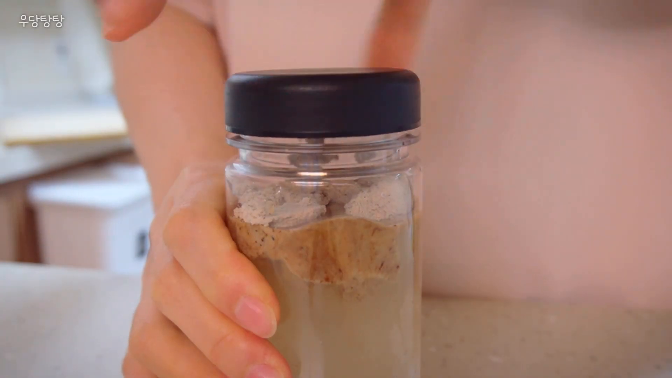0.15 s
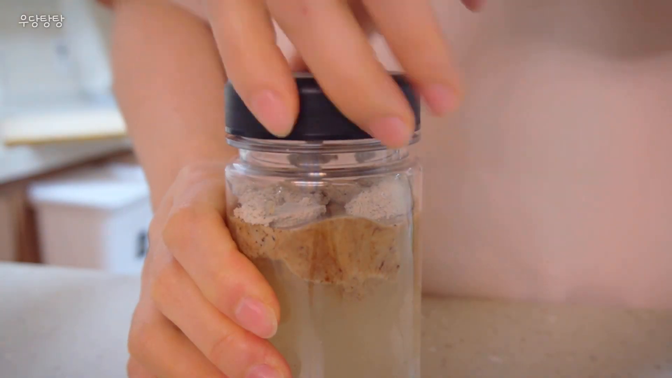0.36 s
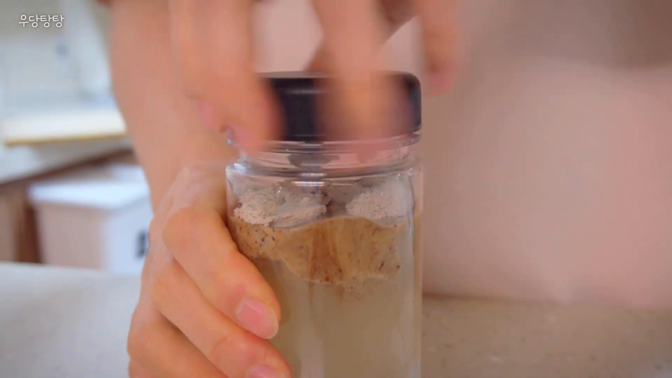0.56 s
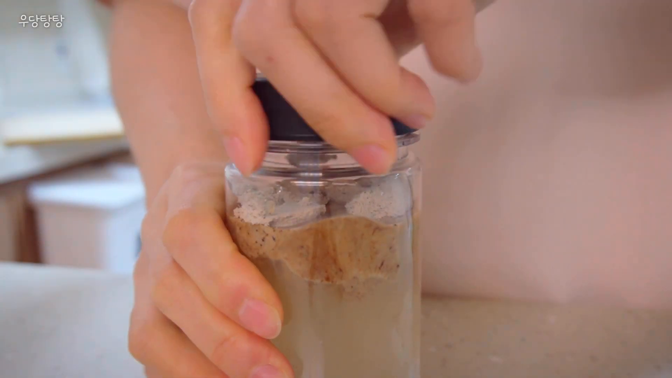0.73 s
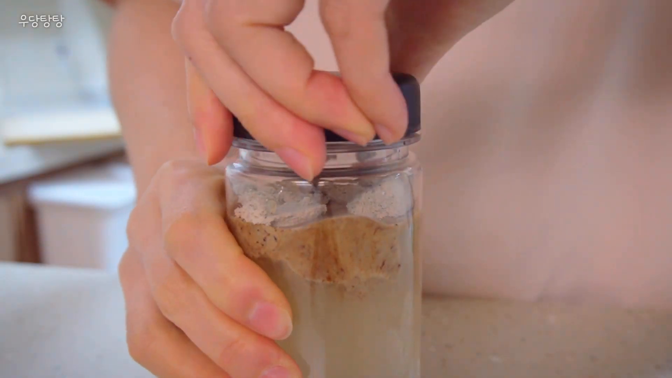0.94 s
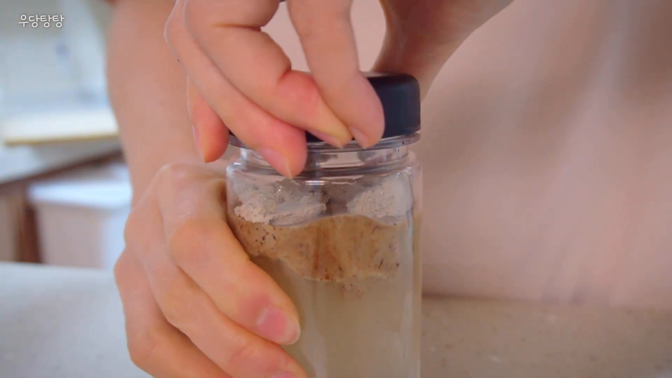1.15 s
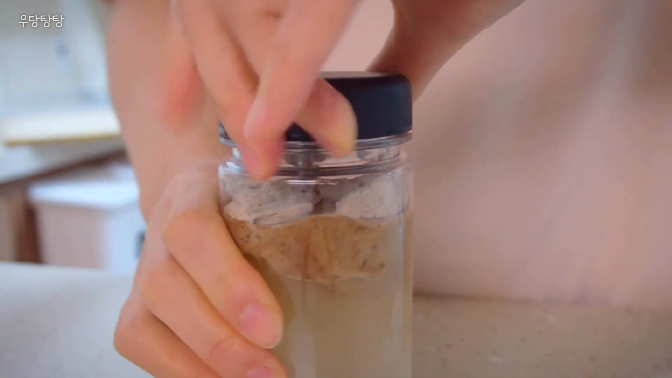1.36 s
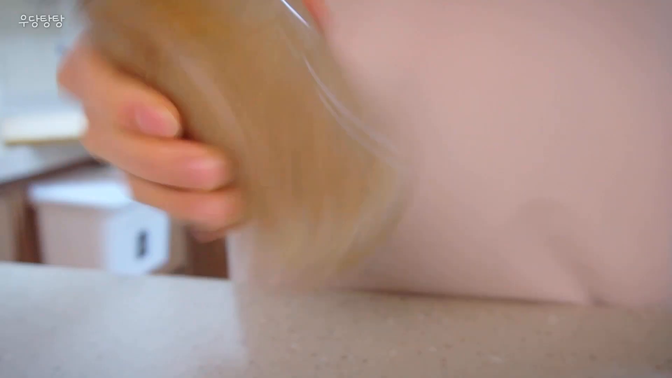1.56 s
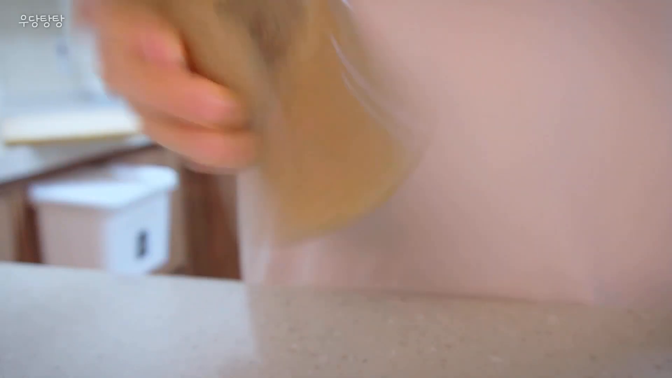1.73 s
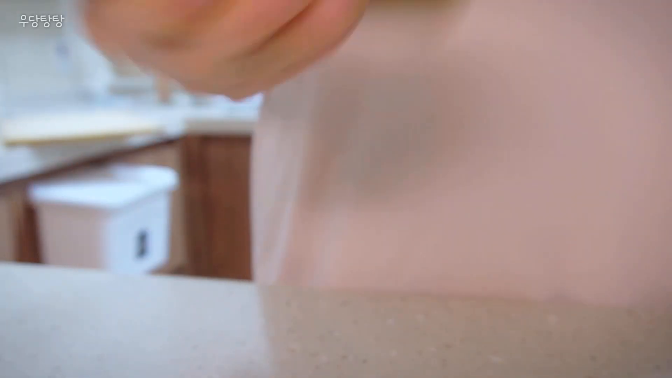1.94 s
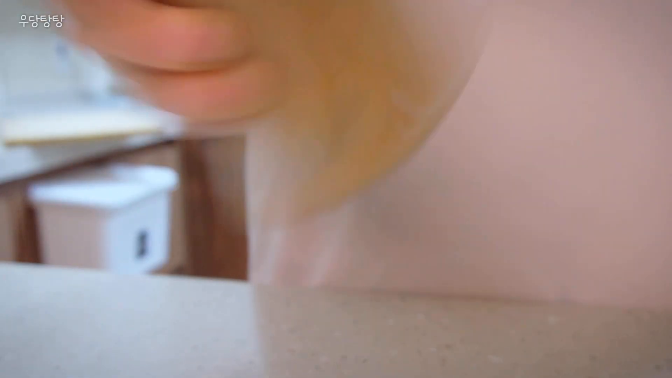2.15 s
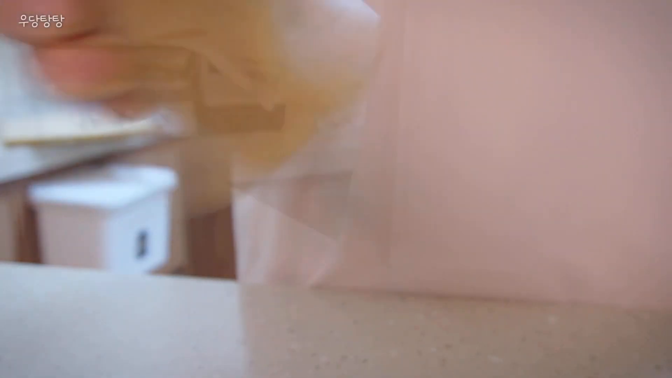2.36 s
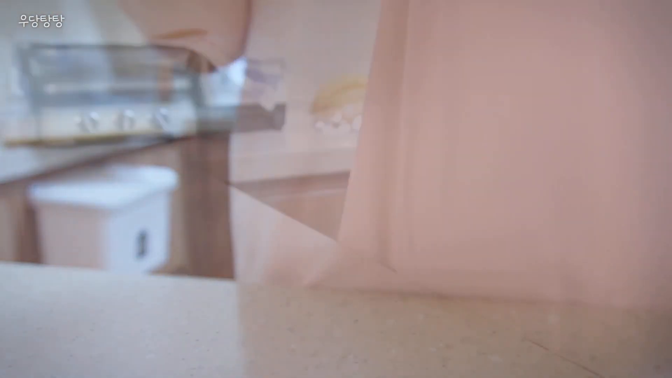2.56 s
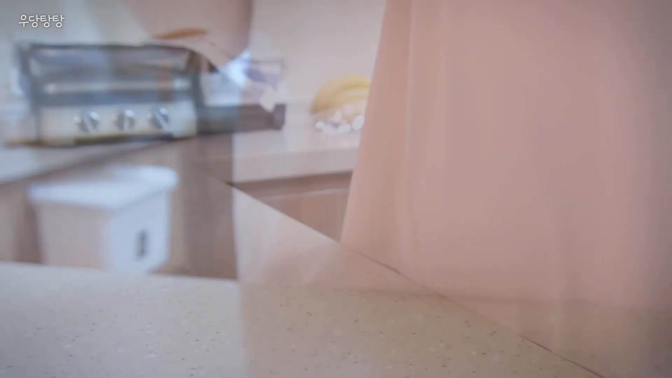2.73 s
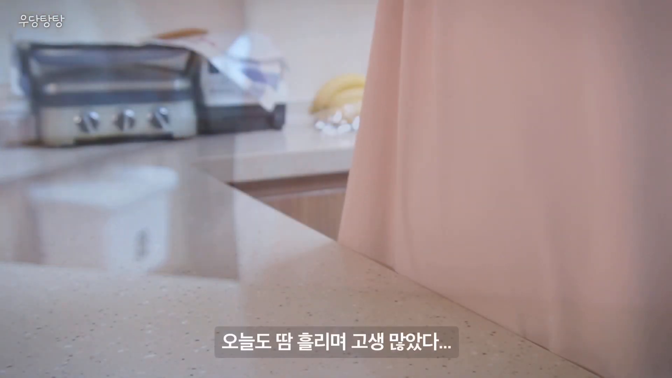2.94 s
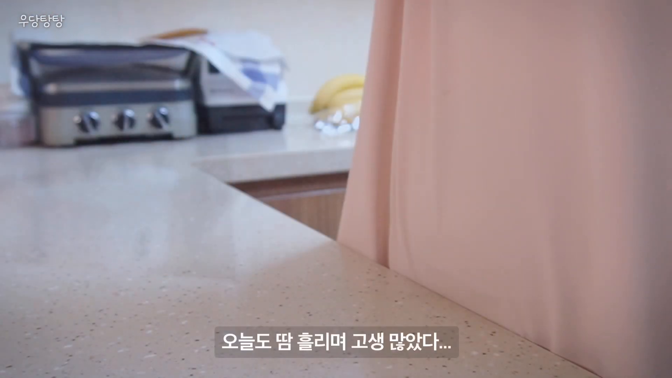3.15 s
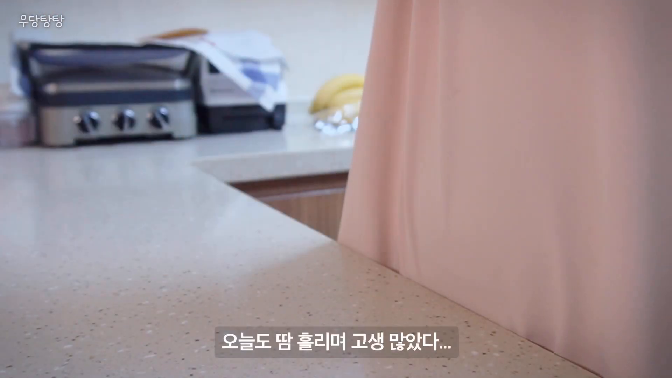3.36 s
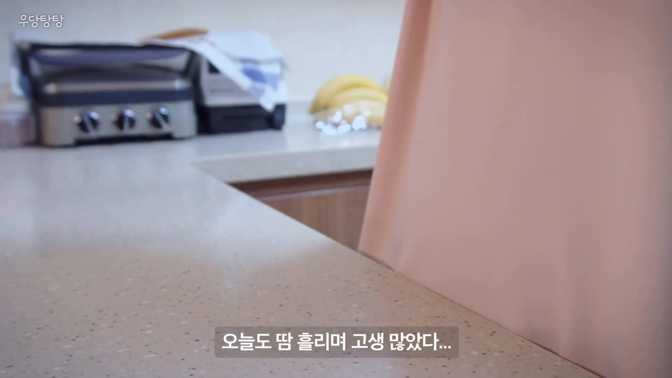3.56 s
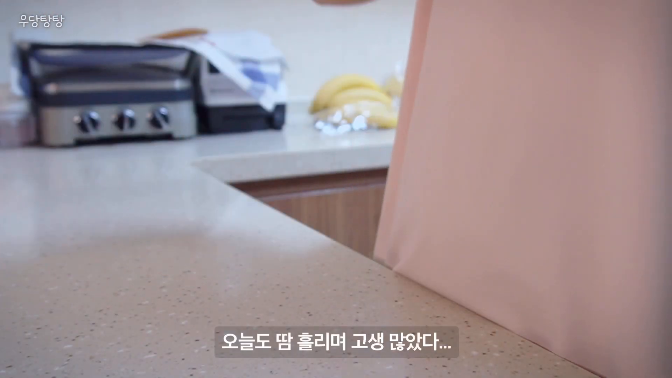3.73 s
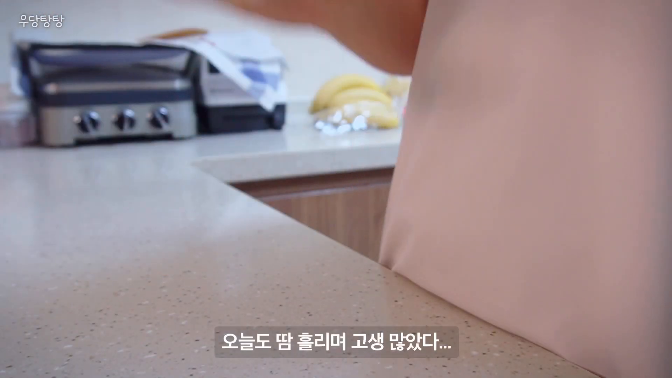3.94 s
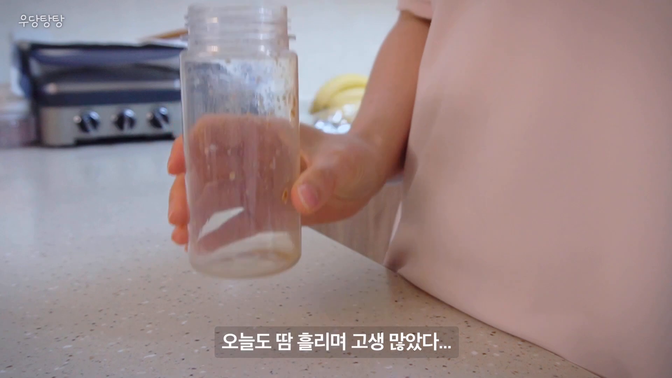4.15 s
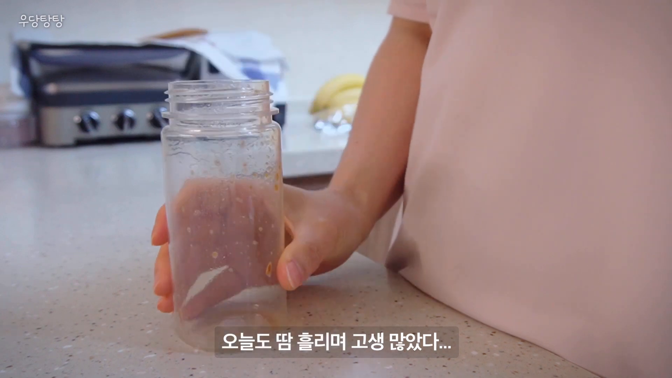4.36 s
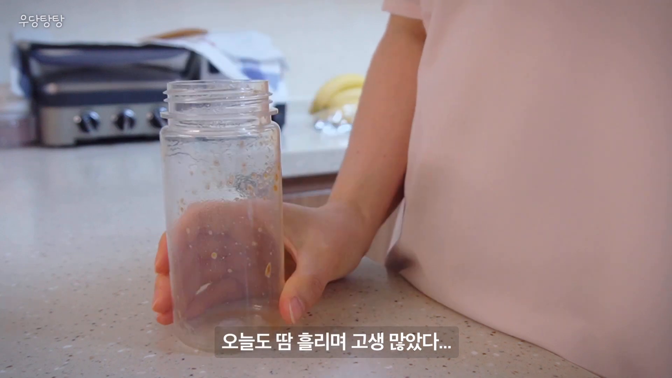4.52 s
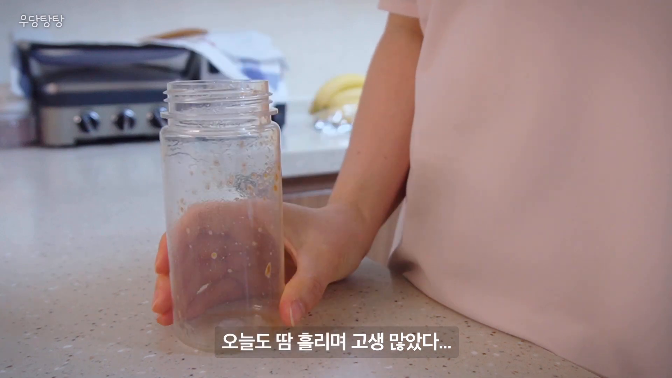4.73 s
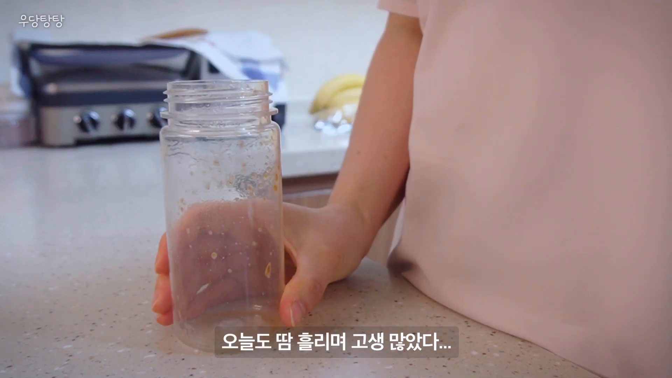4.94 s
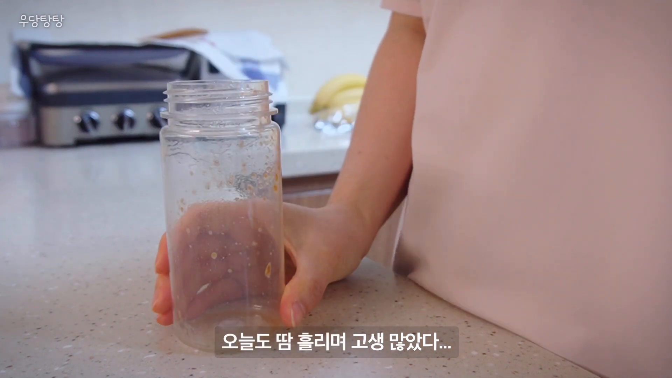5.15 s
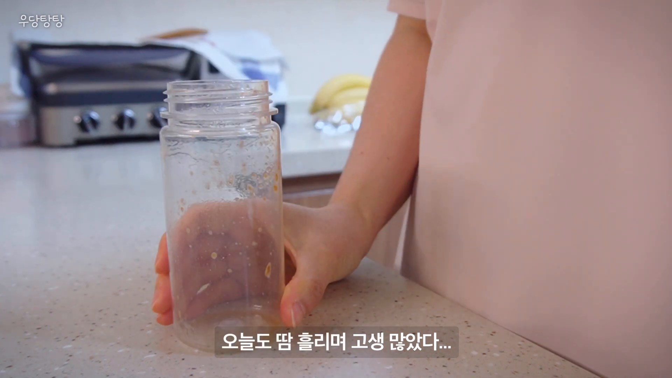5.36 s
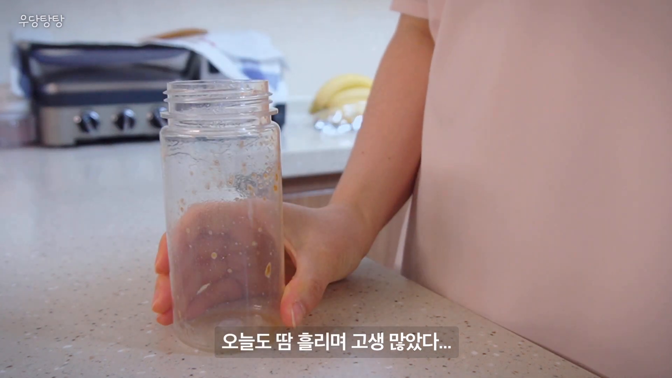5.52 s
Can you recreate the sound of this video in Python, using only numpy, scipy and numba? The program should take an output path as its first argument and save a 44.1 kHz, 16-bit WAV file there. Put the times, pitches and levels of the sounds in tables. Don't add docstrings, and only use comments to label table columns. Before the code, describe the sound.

A close stereo kitchen scene, slightly left, over soft air hiss, unsteady low rumble and a very faint high whine. From 0 to 0.45 s hands rub and twist a plastic lid: clustered clicks, short thread scrapes and dull worktop thumps, with the strongest snap near 0.4 s. Until 1.4 s only light finger touches, small creaks and soft thumps. At about 1.47 s shaking begins, growing vigorous by 2.1 s and hardest around 2.55 s: irregular rapid liquid slaps, foamy hiss, fizzing bubbles, hollow gulps, droplets ticking on plastic walls. At 2.8 s it breaks off abruptly, leaving quiet room air. From 3.4 s a very faint sleeve rustle swells. At 4.38 s the empty bottle hits the stone worktop: a tight cluster of contacts heard as one sharp, hollow, ringing knock, with roughly half a second of room decay. A barely audible tick at 4.75 s, then quiet air to 5.6 s.

```python
import sys
import numpy as np
from scipy import signal
from scipy.fft import rfft, irfft, next_fast_len
from scipy.io import wavfile
from scipy.ndimage import uniform_filter1d
from numba import njit

SR = 44100
rng = np.random.default_rng(int(sys.argv[2]) if len(sys.argv) > 2 else 0)


def undo_db(level):
    steps = np.asarray(level, float) / 20
    return 10 ** steps


def materialize(psi):
    bounded = np.clip(np.atleast_2d(psi).T, -1, 1)
    quanta = np.round(bounded * 32767).astype(np.int16)
    wavfile.write(sys.argv[1], SR, quanta)


N = 250916
T = np.arange(N) / SR
CHANGE_S = 2.808

# [t/s, peak level/dB, centre f/Hz, t60/s]
SLAPS = [(1.474, -21.5, 2297, 0.056), (1.4882, -30.5, 2910, 0.069), (1.5364, -29.5, 3060, 0.096),
         (1.558, -25, 3600, 0.098), (1.587, -22, 2170, 0.029), (1.6421, -18.5, 2250, 0.055),
         (1.6587, -23.5, 1820, 0.076), (1.708, -19.5, 2410, 0.095), (1.7382, -17.5, 1830, 0.051),
         (1.8197, -28, 3940, 0.095), (1.8691, -17, 1605, 0.024), (1.912, -24, 1570, 0.06),
         (1.9499, -25.5, 1440, 0.21), (1.9894, -19.5, 1760, 0.044), (2.062, -23, 4050, 0.089),
         (2.093, -23.5, 1570, 0.16), (2.1283, -18, 3510, 0.053), (2.1566, -20, 2050, 0.032),
         (2.2108, -17.5, 3850, 0.1), (2.2838, -17, 2120, 0.087), (2.274, -25, 2280, 0.05),
         (2.3743, -36, 1990, 0.15), (2.4157, -20, 1640, 0.069), (2.4842, -20, 1950, 0.04),
         (2.5376, -15, 1785, 0.041), (2.561, -34, 2070, 0.042), (2.622, -19, 1504, 0.1),
         (2.646, -17, 1344, 0.073), (2.7164, -26, 2080, 0.11), (2.7502, -15.5, 1560, 0.019),
         (2.798, -27, 1490, 0.065), (1.62, -26.5, 3960, 0.04), (1.684, -27, 2080, 0.05),
         (1.802, -28, 1820, 0.044), (2.039, -23, 1840, 0.05), (2.309, -20, 1670, 0.072),
         (2.342, -22.5, 1850, 0.05), (2.391, -19.5, 1910, 0.061), (2.452, -26, 2000, 0.049),
         (2.468, -27, 1500, 0.059), (2.519, -22.5, 1260, 0.05), (2.583, -22.5, 2210, 0.049),
         (2.608, -23, 2380, 0.04), (2.739, -24, 1370, 0.036)]


def colour(x, points):
    hz, db = np.transpose(points)
    n = next_fast_len(x.shape[1])
    f = np.arange(n // 2 + 1) * SR / n + 1
    gain = undo_db(np.interp(np.log(f), np.log(hz), db))
    return irfft(rfft(x, n) * gain, n)[:, :x.shape[1]]


def hiss(points, size=N):
    x = colour(rng.standard_normal((2, next_fast_len(size))), points)[:, :size]
    return x / x.std()


def hump(hz, below_db, above_db):
    return [(hz / 64, -6 * below_db), (hz, 0), (hz * 64, -6 * above_db)]


def walk(rate):
    k = int(SR / rate)
    held = np.repeat(rng.standard_normal(N // k + 1), k)
    return 1.56 * uniform_filter1d(uniform_filter1d(held, k), k)[:N]


def curve(table, column, after=-150):
    table = np.array(table)
    return np.interp(T, table[:, 0], table[:, column], -150, after)


def rolling(s, length):
    return np.exp(-((T - s) / (.5 * length)) ** 4)


def swell(t, rise, t60):
    e = (1 - np.exp(-t / rise)) ** 2 * np.exp(-np.log(1000) * t / t60)
    return e / e.max()


def add(out, s, x):
    i = int(s * SR)
    out[:, i:i + x.shape[1]] += x[:, :N - i]


@njit
def ring(out_len, start, hz, t60, size, phase, glide, rise, sr):
    out = np.zeros(out_len)
    for k in range(len(start)):
        p = np.exp(2j * np.pi * hz[k] / sr - np.log(1000.) / (t60[k] * sr))
        turn = np.exp(2j * np.pi * hz[k] * glide[k] / (t60[k] * sr * sr))
        z = size[k] * np.exp(1j * phase[k])
        gap = 1.
        close = np.exp(-1 / (rise * sr))
        for i in range(start[k], min(out_len, start[k] + int(t60[k] * sr))):
            gap *= close
            out[i] += z.imag * (1 - gap)
            z *= p
            p *= turn
    return out


def grains(s, hz, t60, db, glide, rise=.001, scatter=.0015, apart=1):
    left, other = rng.random((len(s), 2, 2)).T
    right = left + apart * (other - left)
    sides = []
    for late, turn in (left, right):
        start = ((s + scatter * late) * SR).astype(np.int64)
        sides.append(ring(N, start, hz, t60, undo_db(db), 2 * np.pi * turn, glide + 0 * s, rise, 1. * SR))
    return np.array(sides)


def kitchen():
    # [f/Hz, level/dB per Hz]
    air_colour = [(15, -47), (25, -18.0), (59, -3.5), (323, -6), (359, -1.5), (580, -10.5), (700, -12.0),
                  (913, -11.0), (2380, -15.5), (4060, -19.5), (11500, -31.5), (14600, -32), (15000, -25),
                  (15400, -22), (16000, -23)]
    later = T > CHANGE_S
    duck_db = np.interp(T, [1.55, 2.05, 2.45, 2.6], [-3.0, 1.0, -5, 0])
    air = hiss(air_colour) * undo_db(-56.05 + duck_db + .5 * walk(5.11))

    dips_db = -5 * rolling(1.2, 0.45) - 10 * rolling(2.29, 0.13) - 8 * rolling(2.075, .04)
    unsteady_db = 4.75 * np.clip(walk(14), -3, 1.2) + 0.62 * walk(5.24)
    rumble = hiss(hump(173.0, 17.0, 8.8)) * undo_db(dips_db + np.where(later, -61.5, -55.5) + unsteady_db)

    turn = 2 * np.pi * 15644 * T
    lead_rad = 2.3 + (np.pi - 2.3) * rolling(4.125, 0.55)
    whine_db = np.array([[-64], [-62.5]]) - 5 * (1 - later)
    return air + rumble + undo_db(whine_db) * np.sin([turn + lead_rad, turn])


def hands():
    # [t/s, level/dB, treble over it/dB]
    grip = [
        (0.0, -47.5, -27),
        (0.08, -51, -1.5),
        (0.19, -51, -4.5),
        (0.25, -44, -70),
        (0.36, -47, 9),
        (0.55, -59, 9),
        (1.0, -51, -2.5),
        (1.3, -63, -3),
        (1.47, -62, 5.5),
    ]
    sleeve = [(3.41, -73.5, 0), (4.4, -70.5, 12.5), (4.37, -70.5, 12.5)]
    out = 0
    for table, top_slope in ((grip, 9), (sleeve, 24)):
        db = curve(table, 1) + 2.05 * walk(39.9)
        dull = undo_db(db + 1.0) * hiss(hump(2300, 1.7, top_slope))
        bright = undo_db(db + curve(table, 2) + 1.5) * hiss(hump(4500, 3.2, top_slope))
        out = out + dull + bright
    return out


def lid():
    # [f/Hz, width/Hz, level/dB]
    lid_modes = [(262, 210, 20.5), (1270, 180, 11.5), (1890, 15, -21), (2120, 240, 20), (3590, 35, -7),
                 (3950, 86, 11), (6820, 150, -15)]
    # [t/s, peak level/dB, centre f/Hz, treble over peak/dB, t60/s]
    catches = [(0.096, -22, 1870, -28, 0.052), (0.128, -22.5, 1510, -17, 0.027),
               (0.134, -29, 3950, -14, 0.037), (0.142, -27.5, 2470, -7, 0.024),
               (0.214, -31, 1210, -30, 0.091), (0.224, -18.5, 2400, -39, 0.25),
               (0.24, -21.5, 1230, -52, 0.11), (0.257, -21, 1990, -31, 0.04),
               (0.288, -30.5, 1600, -24, 0.12), (0.347, -24.5, 1420, -3, 0.1),
               (0.361, -20.5, 1470, -13, 0.086), (0.377, -27, 810, -27, 0.03),
               (0.396, -11.5, 2120, -17, 0.029), (0.418, -27, 2010, -6, 0.14)]
    # [t/s, peak level/dB, centre f/Hz, t60/s]
    finger_touches = [(0.443, -33, 4460, 0.052), (0.549, -35, 4100, 0.17), (0.594, -34.5, 5900, 0.21),
                      (0.613, -38, 4300, 0.065), (0.704, -36.5, 3320, 0.12), (0.824, -31, 1470, 0.24),
                      (0.845, -39, 1085, 0.037), (0.87, -39, 1890, 0.057), (0.984, -39.5, 1210, 0.1),
                      (1.03, -39.5, 2500, 0.25), (1.079, -37.5, 2700, 0.22), (1.177, -30, 2500, 0.036),
                      (1.408, -45.5, 2380, 0.07), (4.689, -54, 3830, 0.081)]
    # [t/s, peak level/dB, f/Hz, t60/s]
    thumps = [(0.018, -46, 362, 0.47), (0.093, -39, 365, 0.081), (0.128, -33, 375, 0.12),
              (0.219, -33.5, 349, 0.19), (0.258, -30.5, 166, 0.13), (0.288, -41.5, 240, 0.28),
              (0.336, -34, 237, 0.26), (0.402, -31.5, 276, 0.17), (0.56, -41.5, 143, 0.14),
              (0.612, -46, 239, 0.17), (0.7, -40.5, 110, 0.061), (0.839, -40, 439, 0.065),
              (0.981, -37.5, 154, 0.13), (1.178, -31.5, 151, 0.15), (1.349, -42, 175, 0.081),
              (1.391, -40, 162.5, 0.25), (1.462, -41, 171, 0.15), (4.009, -47.5, 171, 0.33)]
    out, t = np.zeros((2, N)), T[:8192]
    touches = [(s, db, hz, -14 + 13 * np.log2(hz / 2000), t60) for s, db, hz, t60 in finger_touches]
    contacts = list(catches) + touches
    rise = .006
    for s, db, hz, treble_db, t60 in contacts:
        body = hiss(hump(hz, 5.7, 18.0), size=8192)
        treble = undo_db(treble_db + 2) * hiss(hump(7400, 5.3, 17.0), size=8192)
        stick_slip_db = 5 * np.repeat(rng.standard_normal(size=64), repeats=128).clip(-2, 1.5)
        fade = swell(t, rise, np.clip(t60, .02, .4))
        add(out, s - rise, undo_db(db - 13.0 + stick_slip_db) * (body + treble) * fade)
        click = hiss(hump(3100, 1.3, 26), size=8192) * swell(t, 0.00051, 0.035)
        add(out, s, undo_db(db - 13.5) * click)

    s, db, own_hz = np.array(contacts)[:, :3].T
    out += grains(s, own_hz, 0.03 + 0 * s, db - 8, 0., rise=0.002)
    for hz, width, mode_db in lid_modes:
        t60 = np.clip(1.6 / width, .01, .06) + 0 * s
        strike_db = db + mode_db - 13.5 + 4 * rng.standard_normal(len(s))
        out += grains(s, hz + 0 * s, t60, strike_db, 0., rise=0.0057)

    s, db, hz, t60 = np.transpose(thumps)
    for detune, side_db in ((.9, -7.5), (1, 3.5), (1.14, -2.5)):
        ring_t60 = np.clip(t60, .04, .5)
        out += grains(s, hz * detune, ring_t60, db - 7.5 + side_db, 0., rise=0.00073, apart=0.16)
    return out + grains(s, 62 + 0 * s, 0.21 + 0 * s, db - 13.5, 0., rise=0.0063, apart=0.26)


def surge():
    out = np.zeros((1, N))
    for s, db, _, _ in SLAPS:
        add(out, s - .004, undo_db(db + 15.5) * np.exp(-T[None, :8192] / 0.02))
    return np.tanh(uniform_filter1d(out[0], size=256))


def pocket():
    # [t/s, length/s, level over the churn/dB, f/Hz]
    rolls = [
        (1.482, .02, -4, 480),
        (1.672, 0.17, -8.5, 605),
        (1.782, 0.038, -6, 516),
        (1.978, 0.12, -8.5, 540),
        (2.196, 0.064, -12, 530),
        (2.412, 0.11, -20.5, 527),
        (2.542, 0.12, -10.5, 520),
        (2.66, 0.067, -13, 560),
        (2.75, 0.021, -16.5, 474),
    ]
    rest_db = -20
    db = 20 * np.log10(undo_db(rest_db) + sum(undo_db(db) * rolling(s, length) for s, length, db, _ in rolls))
    s, _, _, hz = np.transpose(rolls)
    nearest_s = np.abs(T - s[:, None]).min(axis=0)
    hum = sum(hiss(hump(f, 51, 71)) * (np.abs(T - at) <= nearest_s) for at, f in zip(s, hz))
    return db, np.interp(T, s, hz), hum


def froth(db, pocket_db, hum, hollow_tilt):
    # [f/Hz, level/dB per Hz]
    churn = [(88, -56), (150, -17), (274, -3.5), (519, -0.5), (736, 5.5), (796, 6.5), (1870, 3), (3160, 7),
             (3830, 6), (6230, 1), (15500, -55)]
    # [f/Hz, level over the churn/dB]
    wall = [(1330, -16), (1620, -14), (1900, -11), (2350, -13), (2800, -15), (3500, -14), (4300, -16)]
    churn_hz, churn_db = np.transpose(churn)
    low_fill_db = np.interp(T, (1.55, 1.69), [-21, 0])
    out = hum * undo_db(db + pocket_db - 1.5)
    for band in 330 * 1.26 ** np.arange(16):
        share_db = np.interp(np.log(band), np.log(churn_hz), churn_db) + 10 * np.log10(band / 2000)
        share_db = share_db + (band < 800) * 0.21 * (pocket_db + 13)
        share_db = share_db + hollow_tilt * max(np.log2(band / 2400), 0)
        share_db = share_db + (band < 1300) * low_fill_db
        patchy_db = 6.5 * np.clip(walk(35.02), -3, 1.3)
        out = out + hiss(hump(band, 29, 35)) * undo_db(db + share_db - 20.5 + patchy_db)
    for hz, wall_db in wall:
        out = out + hiss(hump(hz, 75, 75)) * undo_db(db + wall_db + 6 * np.clip(walk(24), -3, 1.3))
    return out


def bubbles(count, start, db, low_hz, spread, cycles, glide, rise):
    when, pitch, big, long = rng.random((count, 4)).T
    s = start + (CHANGE_S - start) * when
    at = (s * SR).astype(int)
    hz = low_hz[at] * spread ** pitch
    size_db = -3.6 * np.log(.07 + big)
    t60 = cycles * (0.23 + long) / hz
    return grains(s, hz, t60, db[at] + size_db, glide, rise=rise, apart=.7)


def slaps():
    # [t/s, peak level/dB]
    ticks = [(1.481, -35), (1.4873, -27.5), (1.564, -33), (1.587, -27), (1.6607, -33), (1.6876, -30),
             (1.7064, -29.5), (1.739, -27), (1.82, -28.5), (1.8724, -27), (1.9477, -29), (1.985, -38),
             (2.0135, -30), (2.067, -18.5), (2.115, -27), (2.1284, -37), (2.2105, -25), (2.292, -39),
             (2.3283, -28), (2.391, -28), (2.407, -26), (2.4594, -34), (2.467, -28.5), (2.489, -26),
             (2.5329, -45), (2.622, -23), (2.666, -30.5), (2.719, -27.5), (2.7535, -25.5), (2.8048, -22)]
    # [t/s, peak level/dB, f/Hz]
    low_slaps = [(1.564, -37, 899), (1.738, -27, 610), (1.779, -26, 710), (1.833, -30, 780),
                 (1.869, -24, 1180), (1.911, -28, 1010), (1.962, -31, 1010), (2.034, -35, 650),
                 (2.074, -31, 915), (2.213, -19, 630), (2.276, -17, 1110), (2.345, -33, 1060),
                 (2.399, -28, 923), (2.451, -32, 1120), (2.471, -25, 910), (2.512, -30, 1110),
                 (2.542, -15, 1200), (2.58, -21, 982), (2.609, -19, 1080), (2.651, -29, 1070),
                 (2.75, -32, 1090), (2.792, -35, 1170)]
    # [t/s, peak level/dB, f/Hz]
    slosh = [(1.577, -57, 175), (1.694, -48, 275), (1.773, -49, 269), (1.826, -40, 291), (1.891, -48, 202),
             (1.988, -43, 170), (2.035, -36, 315), (2.091, -47, 313), (2.151, -41, 315), (2.242, -55, 213),
             (2.343, -52, 159), (2.456, -44, 215), (2.51, -40, 315), (2.732, -42, 261)]
    out, t = np.zeros((2, N)), T[:4096]
    for s, db, hz, t60 in SLAPS:
        splash = hiss(hump(hz, 8.2, 12.5), size=4096) * swell(t, 0.0035, np.clip(t60, .02, .2))
        add(out, s - .004, undo_db(db - 9.5) * splash)
        crack = hiss(hump(hz, 4.8, 8.8), size=4096) * swell(t, 0.00038, 0.013)
        add(out, s, undo_db(db - 9.5) * crack)

    tick_hz = 6400 * 1.17 ** rng.standard_normal(len(ticks))
    for (s, db), hz in zip(ticks, tick_hz):
        tick = hiss(hump(hz, 3.1, 21.0), size=4096) * swell(t, 0.00066, 0.021)
        add(out, s - .001, undo_db(db - 2.0) * tick)
        speck = hiss(hump(12000, 9.7, 3), size=4096) * swell(t, .0003, .008)
        add(out, s, undo_db(db - 13) * speck)
    s, db = np.transpose(ticks)
    ring_hz = 9650 * 1.18 ** rng.standard_normal(len(s)).clip(-2, 2)
    out += grains(s, ring_hz, 0.015 + 0 * s, db - 8, 0.067, rise=0.00049)

    s, db, hz, t60 = np.transpose(SLAPS)
    out += grains(s - .001, hz, .7 * t60, db - 1, .03, rise=.0028, apart=.4)
    for table, cycles in ((low_slaps, 22), (slosh, 14)):
        s, db, hz = np.transpose(table)
        out += grains(s - .002, hz, cycles / hz, db - 3, .03, rise=0.0013, apart=np.clip(hz / 900, 0, 1))
    return out


def shaking():
    # [t/s, churn level/dB]
    effort = [
        (1.5, -43),
        (1.524, -48),
        (1.538, -37),
        (1.63, -35),
        (1.8, -32.5),
        (2.09, -27.5),
        (2.3, -29),
        (2.58, -26.5),
        (2.8, -30.5),
    ]
    # [t/s, dip level/dB]
    lulls = [(1.629, -2), (1.7, 0.5), (1.765, -2), (1.938, -3.5), (2.199, -3), (2.265, -1.5), (2.331, -4.5),
             (2.441, -3), (2.505, -1), (2.61, -4.5), (2.71, -2.5), (2.785, -2)]
    # [t/s, resonance f/Hz, level over the churn/dB, treble tilt/dB per octave]
    hollow_space = [
        (1.53, 1950, 9, -2),
        (1.632, 2210, -6, 1),
        (1.936, 1690, -7, 2),
        (2.042, 1990, -3, 1.5),
        (2.074, 1720, -2, 2),
        (2.24, 2220, -0.5, -0.5),
        (2.662, 1690, -8, 0),
        (2.686, 1980, -12, -2.5),
        (2.8, 1640, -5, 2.5),
    ]
    effort_db = curve(effort, 1, after=None)
    lull_db = sum(dip_db * rolling(s, 0.031) for s, dip_db in lulls)
    db = effort_db + lull_db + 4.5 * (surge() - .4)
    pocket_db, pocket_hz, hum = pocket()
    spray_db = db - 8 - 0.73 * np.clip(effort_db + 24.0, -12, 12)
    froth_hz = 2095 - 412 * (T - 1.5)
    hollow_hz = curve(hollow_space, 1, after=None)

    out = froth(db, pocket_db, hum, curve(hollow_space, 3, after=0))
    out = out + hiss(hump(3840, 8.3, 10.5)) * undo_db(spray_db - 3.5 + 3.04 * walk(150))
    out += bubbles(count=350, start=1.5, db=spray_db + 11.5, low_hz=0 * T + 5000,
                   spread=2.8, cycles=16.0, glide=.1, rise=0.00032)
    out += bubbles(count=1400, start=1.7, db=db - 6, low_hz=0 * T + 1600,
                   spread=3.42, cycles=37, glide=0.34, rise=0.00032)
    out += bubbles(count=450, start=1.53, db=db - 2.5, low_hz=0.65 * np.clip(froth_hz, 900, 3000),
                   spread=2.3, cycles=68, glide=0.026, rise=0.0027)
    out += bubbles(count=170, start=1.58, db=db + pocket_db + 2.5, low_hz=0.798 * pocket_hz,
                   spread=1.598, cycles=21.6, glide=0.091, rise=0.00059)
    out += bubbles(count=500, start=1.532, db=db + curve(hollow_space, 2), low_hz=.9 * hollow_hz,
                   spread=1.3, cycles=43, glide=0.034, rise=0.0017)
    out += slaps()
    tail_s = 0.013
    end_s = [CHANGE_S - .001, CHANGE_S, CHANGE_S + tail_s, CHANGE_S + 2 * tail_s]
    return out * undo_db(np.interp(T, end_s, [0, -25.5, -38.5, -90]))


def knock():
    # [t/s, blow level/dB]
    blows = [
        (4.373, -37),
        (4.38, -22.5),
        (4.387, -21.5),
        (4.395, -28.5),
        (4.404, -27.5),
    ]
    # [f/Hz, level/dB, t60/s]
    bottle_modes = [(147, -18, 0.29), (478, -2.5, 0.053), (1280, -7, 0.057), (1510, -18, 0.55),
                    (2283, 4, 0.046), (2690, -8, 0.1), (2900, -7, 0.27), (3700, -15, 0.14),
                    (3380, -26, 0.53), (4470, -29, 0.052), (5280, -16, 0.25), (5470, -31, 0.43),
                    (6100, -30, 0.44), (6310, -9.5, 0.047)]
    # [f/Hz, level/dB per Hz]
    knock_colour = [(29, -58), (50, -13), (151, -3), (310, 0), (477, 2), (849, -21), (1280, 9.5),
                    (1510, -7), (2890, -0.5), (4670, -20.5), (15500, -32.5)]
    # [f/Hz, t60/s]
    kitchen_t60 = [(60, 1), (300, 0.53), (2000, 0.39), (10000, 0.52)]
    # [f/Hz, level/dB, t60/s]
    clear_rings = [(481, -29, .28), (459, -32, .33), (1200, -36, .3), (1297, -27, .28), (1318, -36, .3),
                   (1599, -38, .3), (2290, -17, .045), (2900, -22, .06), (2315, -36, .5), (2400, -38, .5),
                   (3235, -36, .22), (4398, -50, .35)]
    # [f/Hz, level/dB, t60/s]
    echoes = [(151.4, -30.5, 0.38), (670, -37, 0.22), (1010, -36.5, 0.42), (1570, -34.5, 0.49),
              (2380, -33.5, 0.43), (3230, -34, 0.34), (4400, -61, 0.4), (5520, -42, 0.39),
              (7050, -39.5, 0.32)]
    out, t = np.zeros((2, N)), T[:32768]
    hz, mode_db, t60 = np.transpose(bottle_modes)
    for s, db in blows:
        split = 1 + 0.0069 * rng.standard_normal(len(hz))
        out += grains(s + 0 * hz, hz * split, np.clip(t60, .03, .13), db + mode_db, 0.,
                      rise=0.0016, apart=np.clip(hz / 4000, 0, .5))
        crack = hiss(knock_colour, size=4096) * swell(t[:4096], 0.0029, 0.034)
        add(out, s - .002, undo_db(db + 2.0) * crack)
    add(out, 4.755, undo_db(-58) * hiss(hump(4450, 90, 90), size=4096) * swell(t[:4096], .003, .07))

    hz, db, t60 = np.transpose(clear_rings)
    out += grains(4.381 + 0 * hz, hz, t60, db, 0., rise=.003, apart=.25)
    for hz, db, t60 in echoes:
        add(out, 4.378, undo_db(db) * hiss(hump(hz, 66, 73), size=32768) * swell(t, 0.0042, t60))

    room_hz, room_t60 = np.transpose(kitchen_t60)
    colour_hz, colour_db = np.transpose(knock_colour)
    for band in 60 * 2. ** np.arange(8.1):
        share_db = np.interp(np.log(band), np.log(colour_hz), colour_db) + 10 * np.log10(band)
        fade = swell(t, 0.0048, np.interp(np.log(band), np.log(room_hz), room_t60))
        add(out, 4.377, undo_db(share_db - 61.5) * hiss(hump(band, 9.2, 17.6), size=32768) * fade)
    return out


def scene():
    # [f/Hz, level/dB]
    microphone = [(20, -1.5), (6000, 0.5), (10000, -1.5), (13000, -7), (15800, -11)]
    # [f/Hz, level/dB]
    side_colour = [(30, -3), (250, 0.5), (450, -0.5), (16000, 0)]
    near = colour(hands() + lid() + shaking() + knock(), microphone)
    left, right = near * undo_db(np.array([[.45], [-.45]])) + kitchen()
    side = colour(.5 * (left - right)[None], side_colour)[0]
    return .5 * (left + right) + np.array([side, -side])


def top_cut(x):
    return signal.sosfilt(signal.butter(12, 16270, fs=SR, output="sos"), x)


def record(dry):
    trimmed = colour(dry, [(20, 0), (15850, 0), (15880, -140)])
    return top_cut(trimmed)


dry = scene()
out = record(dry)
materialize(out)
```